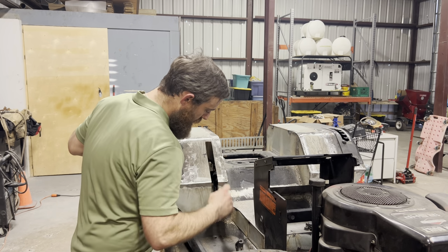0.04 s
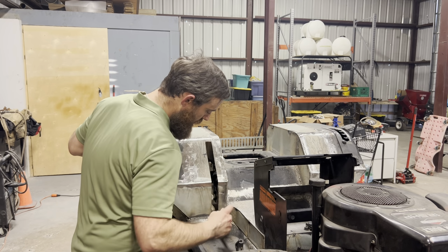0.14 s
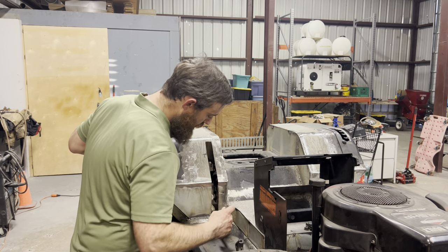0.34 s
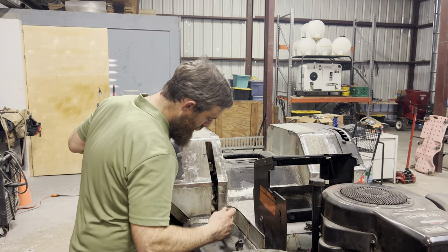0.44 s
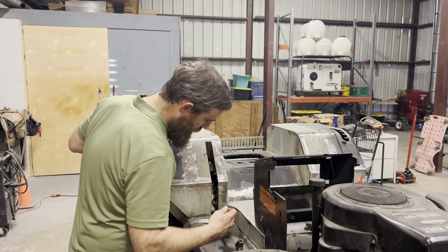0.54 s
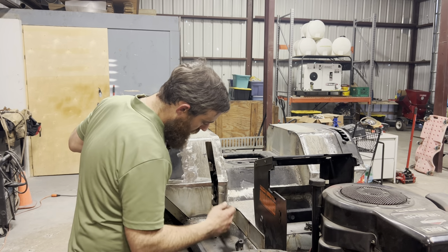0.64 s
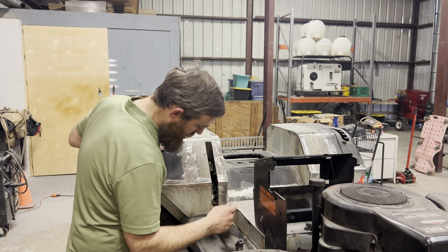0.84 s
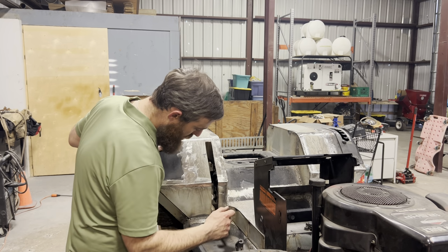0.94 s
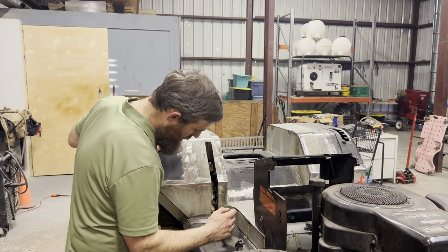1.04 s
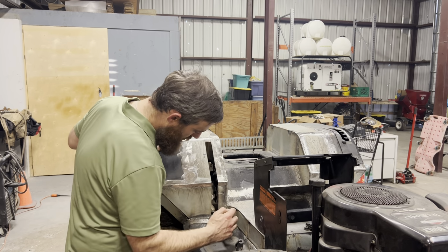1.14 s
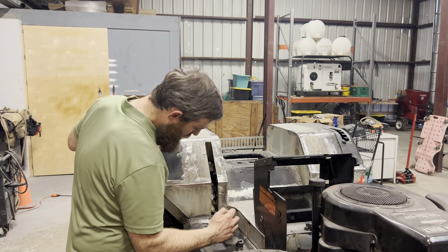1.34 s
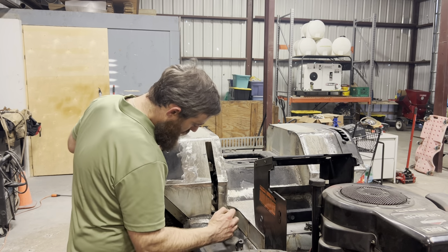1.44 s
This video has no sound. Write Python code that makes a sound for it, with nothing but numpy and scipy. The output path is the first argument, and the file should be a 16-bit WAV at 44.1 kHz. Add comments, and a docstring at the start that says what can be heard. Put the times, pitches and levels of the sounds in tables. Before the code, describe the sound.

A steel gear lever clunks loudly into its stop, followed by lighter rattles and knocks.

```python
"""A steel gear lever slams into its stop and rings a bare machine chassis in a sheet-metal workshop.
The detent clicks first, as the lever is pushed through its gate; after the clunk the linkage rattles,
then come lighter knocks and one thin spring ping. Each hit rings damped modes of the steel.
The hall echoes over a low rumble; the big clunk overloads the microphone."""
import sys
import numpy as np
from scipy import signal
from scipy.fft import rfft, irfft
from scipy.io import wavfile

SR = 44100
rng = np.random.default_rng(int(sys.argv[2]) if len(sys.argv) > 2 else 0)


def transcribe(signal):
    """Save signal, clipped to [-1, 1], as a 16-bit WAV file at the path in sys.argv[1]."""
    frames = np.atleast_2d(signal).T
    limited = np.clip(frames, -1, 1)
    pcm = np.round(limited * 32767).astype(np.int16)
    wavfile.write(sys.argv[1], SR, pcm)


N = 66150
CLUNK_S, PING_S = .1358, .863

# blow spectrum (frequency [Hz], relative level [dB/octave])
CLUNK_SPECTRUM_DB = [(50, -43), (120, -31), (200, -13.5), (420, -5), (800, -8), (1400, 0), (2050, 1.5),
                     (2500, -7), (5000, -7), (8000, -11.5), (13000, -6.5), (16000, -19.5)]
# blow peaks and dips (frequency [Hz], width [Hz], gain [dB])
CLUNK_RESONANCES = [(280, 40, -2), (640, 110, 4.5), (1018, 70, -7.5), (1095, 80, 6), (1252, 92, -5.5),
                    (1440, 150, -2.5), (1680, 180, -6), (2530, 200, -3), (2656, 130, 3.5), (5740, 600, 2)]
# dense steel mode decay (frequency [Hz], t60 [s])
STEEL_T60_S = [(150, 0.24), (500, 0.22), (1500, 0.19), (4000, 0.11), (12000, 0.045)]


def clunk(rise_s=.0026, gain_db=-7):
    """The lever hits its stop: a crash of dense steel modes, treble dying first."""
    hz = bins_hz()
    steel = noise(at(CLUNK_SPECTRUM_DB, hz) + resonance_db(CLUNK_RESONANCES, hz))
    return amp(gain_db) * attack(CLUNK_S, rise_s) * fade(steel, CLUNK_S, STEEL_T60_S)


# strong frame modes (frequency [Hz], relative level [dB], t60 [s])
FRAME_MODES = [(160, -19.5, .07), (190.8, -34, 1.5), (222.6, -20, 0.51), (347.2, -9.5, .22),
               (409.7, -19, 0.36), (446.4, -20, .36), (498, -25.5, 1), (533.8, -16.5, 0.37),
               (639.5, -24.5, 0.52), (775, -23.5, .38), (873, -20, 0.36), (1070, -11, .16),
               (1117, -11, 0.23), (1477.5, -12.5, .15), (1531, -24, .5), (1613, -20, 0.051),
               (1807, -12.5, .17)]


def frame_ring(gain_db=1.5):
    """The blow on the stop sets the frame ringing."""
    return amp(gain_db) * ring(FRAME_MODES, CLUNK_S, rise_s=.0015)


# detent and linkage hits (time [s], rise [s], low, mid, high, top relative level [dB], cutoff [Hz])
CONTACT_HITS = [ (.03, 0.022, -38, -50.5, -40, -47, 6000), (0.0416, 0.0027, -43, -38, -43.5, -42.5, 15100),
                (0.0802, 0.0042, -41, -33.5, -22.5, -25.5, 15900),
                (0.0909, 0.0013, -25.5, -32, -45, -46, 6050),
                (0.1242, 0.00092, -28.5, -42, -36, -39.5, 16000),
                (0.1795, 0.0011, -26, -20.5, -34, -34, 15000),
                (0.215, 0.00062, -28.5, -23, -37, -34.5, 16000),
                (.251, 0.0026, -29.5, -37, -58, -30.5, 14800), (0.643, 0.0076, -62, -58, -45, -56, 6000),
                (0.6638, .001, -49, -48, -41, -51, 11000), (0.673, 0.0049, -36.5, -42, -36.5, -48.5, 9000),
                (.698, .002, -55, -39.5, -57, -49.5, 12400), (.7152, .002, -31, -35, -35, -65, 4180),
                (.862, 0.0069, -38.5, -42, -43.5, -52.5, 13100),
                (1.075, 0.0023, -40, -43, -49.5, -72.5, 2700),
                (1.375, .003, -58, -71.5, -73.5, -61.5, 13000), ]
# low, mid, high, top level points (frequency [Hz])
CONTACT_BANDS_HZ = [350, 1100, 2700, 8000]
# lever peaks and dips (frequency [Hz], width [Hz], gain [dB])
LEVER_RESONANCES = [(380, 51, 4), (565, 480, -3), (840, 42, 2), (960, 60, 3), (1232, 83, -3),
                    (1490, 43, 3.5), (2290, 270, 4.5), (3300, 160, -5), (3950, 270, 4.5), (5560, 370, 2.5),
                    (6800, 1100, -2)]
# shaft tones (frequency [Hz], level re contact [dB], t60 [s])
SHAFT_MODES = [(304.3, -7.5, .3), (365, -2.5, 0.27), (416.4, -6.5, .2), (777, -9, .16), (983, -6, .14),
               (1125, -10, .12), (1524, -12, 0.097), (1984, -10, .12), (2422, -5, .09),
               (2722, -10.5, 0.063), (3750, -10, .1), (4030, -8, 0.062)]


def contacts(t60_scale=1.176, bass_cut_hz=270):
    """Clicks and knocks ring lever and shaft; harder contacts are brighter."""
    hz, out = bins_hz(), 0
    # the lever radiates little bass
    lever_db = resonance_db(LEVER_RESONANCES, hz) + rolloff_db(bass_cut_hz / hz, order=2)
    decay = [(f, t60_s * t60_scale) for f, t60_s in STEEL_T60_S]
    for start_s, rise_s, *levels_db, cutoff_hz in CONTACT_HITS:
        spectrum = list(zip(CONTACT_BANDS_HZ, levels_db))
        force_db = lambda f: at(spectrum, f) + rolloff_db(f / cutoff_hz, order=4)
        lever = attack(start_s, rise_s) * fade(noise(lever_db + force_db(hz)), start_s, decay)
        shaft_modes = [(f, db + force_db(f), t60_s) for f, db, t60_s in SHAFT_MODES]
        out = out + lever + ring(shaft_modes, start_s, rise_s)
    return out


# spring modes (frequency [Hz], level [dB], t60 [s])
SPRING_MODES = [(2541, -42, 0.083), (4330, -51, 0.094), (12200, -56, .035), (12560, -45.5, 0.055),
                (12650, -64, 0.35), (13690, -55, .035), (13790, -64, 0.24), (15100, -61, .035)]


def spring_ping():
    """A small spring rings once in thin, high modes."""
    return ring(SPRING_MODES, PING_S, rise_s=.0018)


# hall decay (frequency [Hz], t60 [s])
HALL_T60_S = [(100, 3.1), (330, 1.14), (800, 0.72), (2000, 0.95), (5000, 1), (9000, 0.74), (14000, 0.1)]
# echo spectrum (frequency [Hz], relative level [dB])
HALL_SPECTRUM_DB = [(100, -2), (330, -9), (750, -3.5), (1100, -7.5), (1900, -9), (3000, -6.5), (6000, -6.5),
                    (13000, -6)]


def hall(x, build_s=.016):
    """Diffuse echo: builds quickly, lingers longest in the bass."""
    hz = bins_hz()
    energy_norm = np.sqrt(2 * np.log(1000) / (at(HALL_T60_S, hz) * SR))
    gain = amp(at(HALL_SPECTRUM_DB, hz)) * energy_norm
    reflections = irfft(rfft(rng.standard_normal(N)) * gain, N)
    response = fade(reflections, 0, HALL_T60_S) * attack(0, build_s)
    return signal.fftconvolve(x, response)[:N]


# workshop background (frequency [Hz], level [dB/octave])
RUMBLE_SPECTRUM_DB = [(20, -65), (40, -51), (110, -53.5), (220, -51), (400, -52.5), (800, -65),
                      (1700, -67.5), (3400, -72), (7000, -77), (14000, -76.5)]


def rumble():
    """Steady low noise of the workshop."""
    return noise(at(RUMBLE_SPECTRUM_DB, bins_hz()))


def amp(db):
    """Decibels to gain."""
    return 10 ** (np.asarray(db) / 20)


def at(points, hz):
    """Interpolate (frequency, value) points on a log-frequency axis."""
    f, values = np.array(points, float).T
    return np.interp(np.log(hz), np.log(f), values)


def bins_hz():
    """FFT bin frequencies."""
    return np.maximum(np.arange(N // 2 + 1) * SR / N, 1)


def since(start_s):
    """Seconds since the start, zero before it."""
    return np.maximum(np.arange(N) / SR - start_s, 0)


def noise(octave_db):
    """Random-phase noise with the given level per octave."""
    hz = bins_hz()
    phase = np.exp(2j * np.pi * rng.random(len(hz)))
    magnitude = amp(octave_db) * np.sqrt(N * SR / 2 / (hz * np.log(2)))
    return irfft(phase * magnitude * (hz > 20), N)


def fade(x, start_s, t60_points):
    """Decay each half-octave band at its own rate."""
    spectrum, t, out = rfft(x), since(start_s), 0
    centres_hz = SR / 2 / np.sqrt(2) ** np.arange(20)
    band_index = np.clip(2 * np.log2(SR / 2 / bins_hz()), 0, len(centres_hz) - 1)
    for k, hz in enumerate(centres_hz):
        band = irfft(spectrum * np.maximum(1 - abs(band_index - k), 0), N)
        out = out + band * np.exp(-np.log(1000) * t / at(t60_points, hz))
    return out


def attack(start_s, rise_s):
    """Linear ramp from silence to full level."""
    return np.minimum(since(start_s) / max(rise_s, 1 / SR), 1)


def ring(modes, start_s, rise_s):
    """Struck modes: damped sines at random phases."""
    t, out = since(start_s), 0
    for hz, db, t60_s in modes:
        envelope = amp(db) * np.exp(-np.log(1000) * t / t60_s)
        out = out + envelope * np.sin(2 * np.pi * (hz * t + rng.random()))
    return attack(start_s, rise_s) * out


def resonance_db(peaks, hz):
    """Summed resonance peaks and dips."""
    return sum(db / (1 + (2 * (hz - f) / width_hz) ** 2) for f, width_hz, db in peaks)


def rolloff_db(ratio, order):
    """Filter slope beyond a corner."""
    return -10 * np.log10(1 + ratio ** (2 * order))


def scene(ring_send_db=-16):
    """Lever, frame and spring in the hall, over its rumble."""
    lever = clunk() + contacts()
    frame = frame_ring()
    spring = spring_ping()
    echo = hall(lever + amp(ring_send_db) * (frame + spring))
    return (lever + frame + spring + echo + rumble())[None]


def record(dry, cutoff_hz=15750):
    """The microphone clips on the clunk and cuts the top."""
    lowpass = signal.ellip(10, .1, 70, cutoff_hz, fs=SR, output="sos")
    return signal.sosfilt(lowpass, np.clip(dry, -1, 1))


dry = scene()
out = record(dry)
transcribe(out)
```